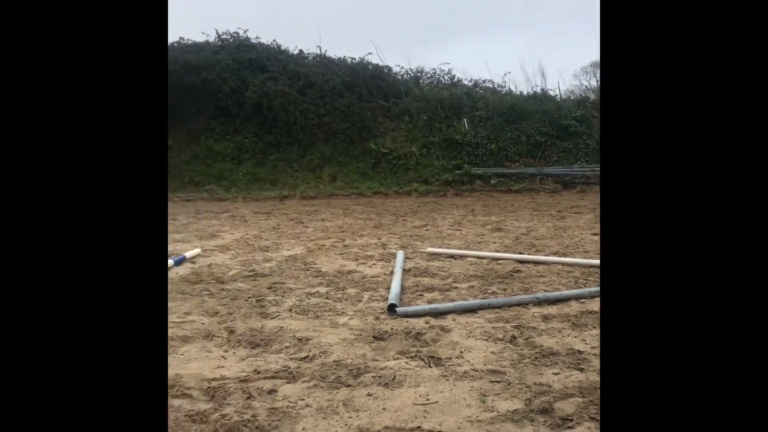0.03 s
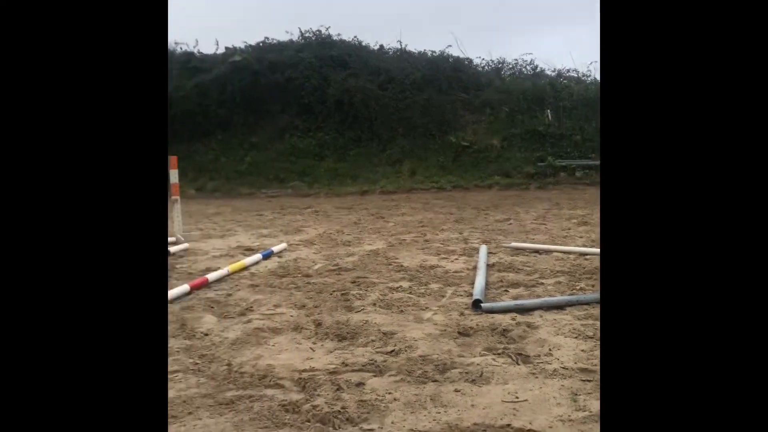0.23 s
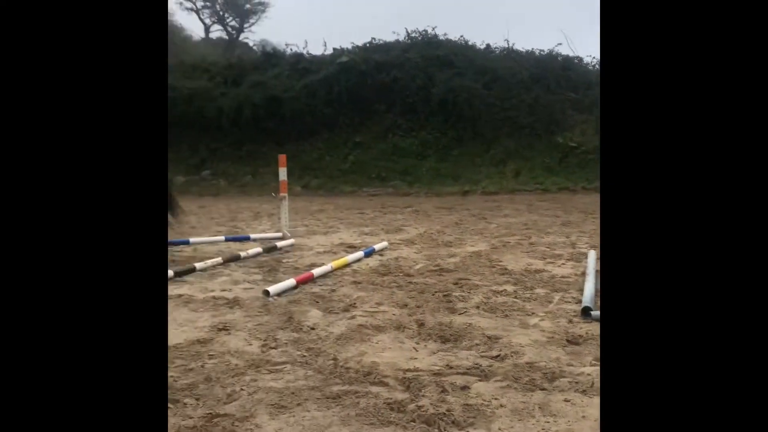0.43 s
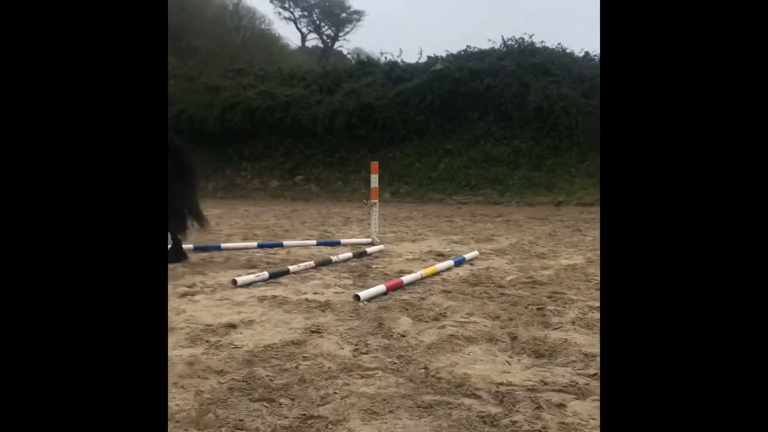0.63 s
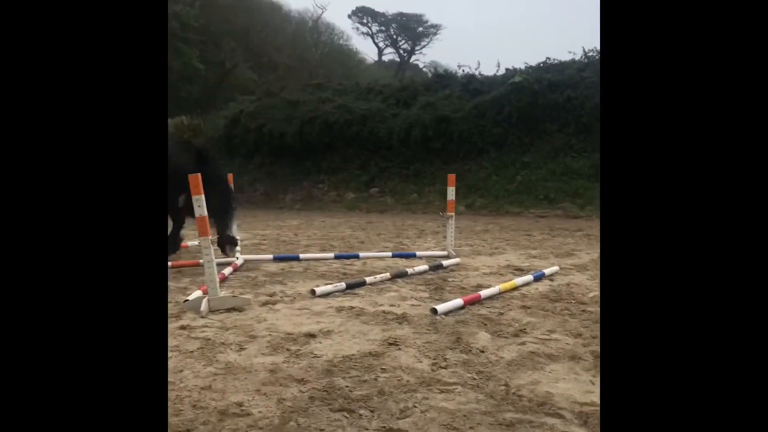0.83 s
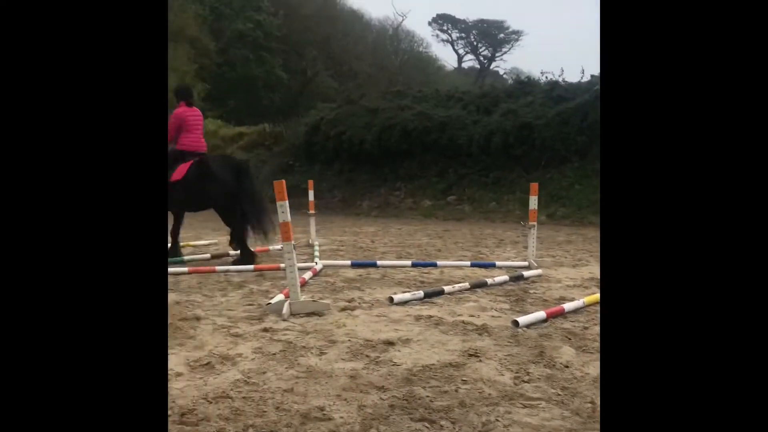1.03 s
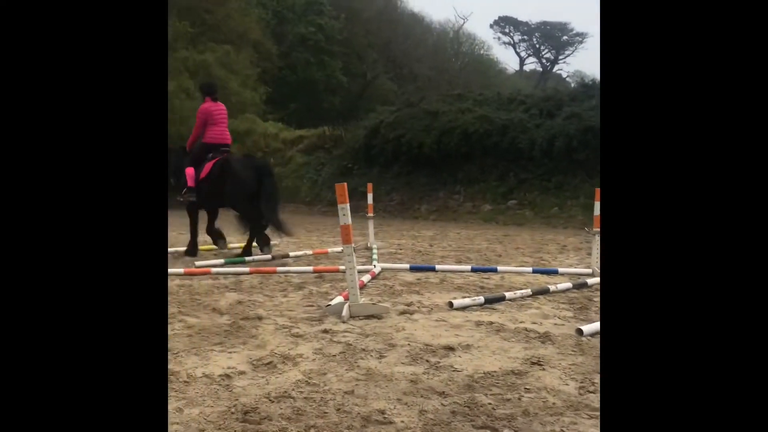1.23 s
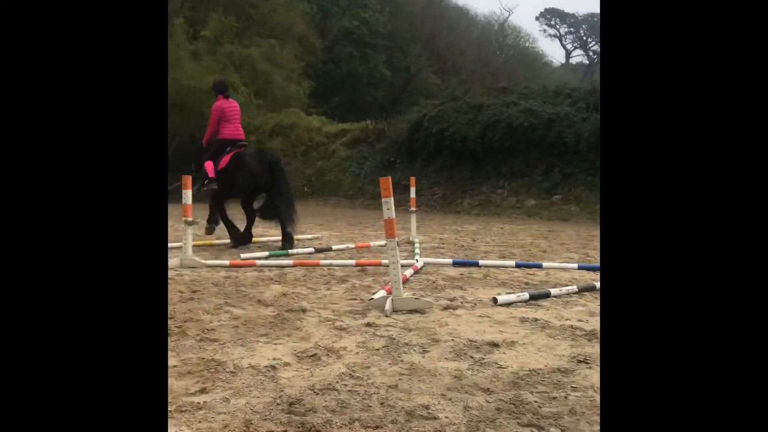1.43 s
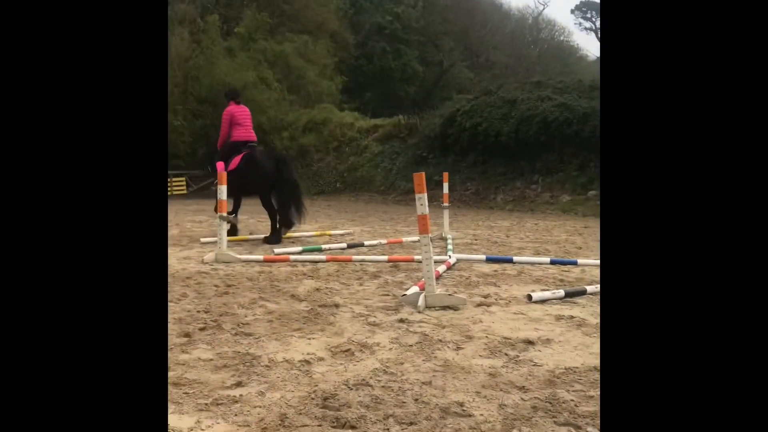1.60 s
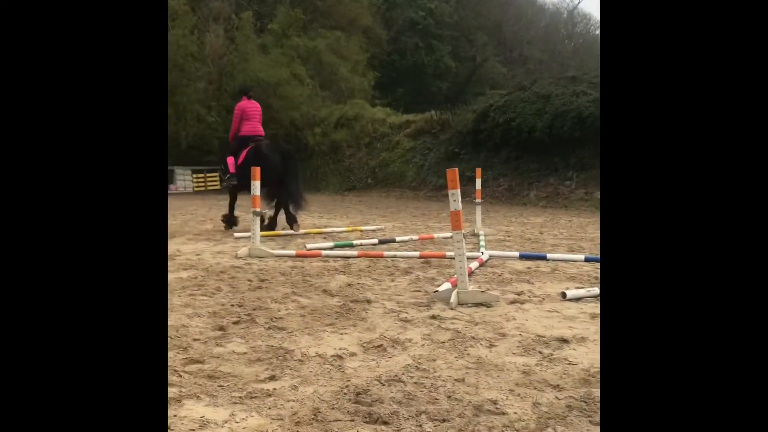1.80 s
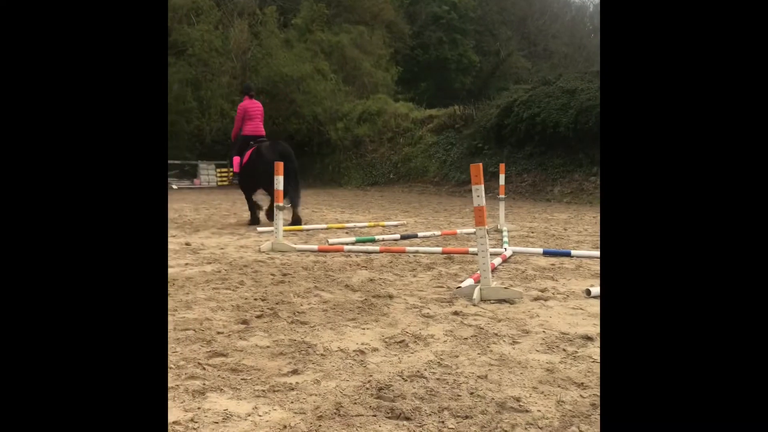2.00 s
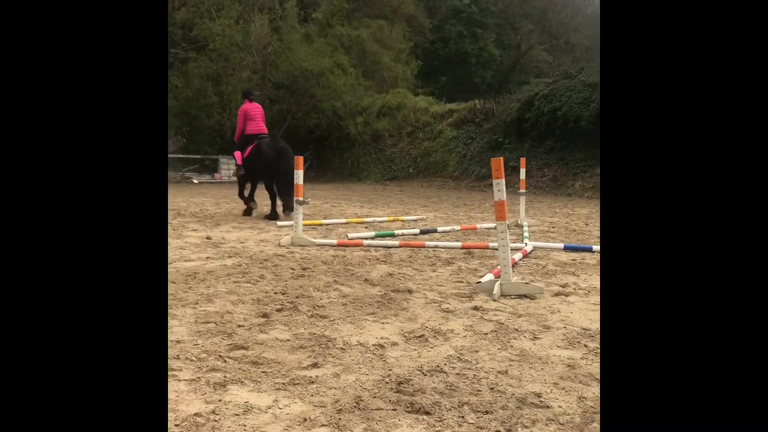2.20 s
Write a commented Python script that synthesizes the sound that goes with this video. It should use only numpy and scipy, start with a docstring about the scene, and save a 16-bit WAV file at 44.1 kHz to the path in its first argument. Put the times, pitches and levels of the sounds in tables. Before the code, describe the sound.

A hoof knocks sharply on a wooden jump pole, with wind buffeting the microphone.

```python
"""Wind rumbles on the microphone over a soft wash of distant leaves, and sand scuffs in an outdoor arena.
A hoof raps a jump pole: the hard contacts give a sharp double crack, the pole's damped modes a hollow
ring, and kicked grains a hiss, while hedges and fences scatter a thin echo. Lighter taps and small
clicks follow among thumping eddies of wind, with two faint gliding tones and a late metallic clink."""
import sys
import numpy as np
from scipy import signal
from scipy.fft import rfft, irfft
from scipy.io import wavfile
from scipy.ndimage import uniform_filter1d

SR = 44100
rng = np.random.default_rng(int(sys.argv[2]) if len(sys.argv) > 2 else 0)


def wav_out(sig):
    """Save sig, one row per channel (or a flat mono array), as 16-bit PCM at SR to the path in sys.argv[1]."""
    wavfile.write(sys.argv[1], SR, np.round(np.clip(np.atleast_2d(sig).T, -1, 1) * 32767).astype(np.int16))


N = 103635


def amp(db):
    """Decibels as an amplitude ratio."""
    return 10 ** (np.asarray(db) / 20)

def unit(x):
    """Normalisation to rms 1."""
    return x / np.sqrt(np.mean(x ** 2) + 1e-20)

def read(points, hz):
    """Interpolation on a log-frequency axis."""
    f, value = np.transpose(points)
    return np.interp(np.log(hz + 1), np.log(f + 1), value)

def add(mix, start_s, sound):
    """Superposition: a sound joins the mix at its start time."""
    part = mix[max(round(start_s * SR), 0):][:len(sound)]
    part += sound[:len(part)]

def colour(x, spectrum):
    """Minimum-phase filtering: a causal response with the given spectrum."""
    log_gain = np.log(amp(read(spectrum, abs(np.fft.fftfreq(2 * N, 1 / SR)))))
    response = np.exp(np.conj(signal.hilbert(log_gain)))
    return irfft(rfft(x, 2 * N) * response[:N + 1])[:N]

def noise(spectrum):
    """Spectral shaping of white noise."""
    gain = amp(read(spectrum, np.fft.rfftfreq(N, 1 / SR)))
    return unit(irfft(rfft(rng.standard_normal(N)) * gain, N))

def steadied(x, span_s):
    """Division by the envelope evens out the chance swells of a noise."""
    power = uniform_filter1d(abs(signal.hilbert(x)) ** 2, max(int(span_s * SR), 2))
    return unit(x / np.sqrt(abs(power) + 1e-9))


# course of the gusts (time [s], rumble level [dB], flutter level [dB])
GUSTS = [(0, -40.5, -65), (0.11, -45, -54), (0.17, -52, -74), (0.24, -36.5, -40), (0.31, -29.5, -34.5),
         (0.369, -45.5, -50), (0.441, -16.5, -25), (0.50, -35, -36.5), (0.58, -32.5, -45.5),
         (0.692, -39.5, -47), (0.752, -21, -25.5), (0.801, -34, -42.5), (0.88, -35, -45),
         (0.938, -26.5, -36), (1.01, -28.5, -50.5), (1.10, -28.5, -34.5), (1.232, -33.5, -33),
         (1.27, -38, -51), (1.32, -31, -48.5), (1.42, -43, -50.5), (1.58, -40.5, -46), (1.761, -28, -43),
         (1.81, -39, -58), (1.88, -31.5, -35), (2.02, -33.5, -47), (2.10, -33, -51), (2.20, -39.5, -57.5),
         (2.29, -32.5, -48), (2.35, -46, -58)]
# spectra of the turbulence (frequency [Hz], relative density [dB])
RUMBLE_SPECTRUM = [(15, -37), (30, 2), (45, 4), (68, 8.5), (90, -0.5), (130, -10.5), (250, -49),
                   (600, -77.5)]
FLUTTER_SPECTRUM = [(40, -22), (90, 2), (135, 1), (200, -7.5), (300, -19), (450, -33), (900, -67),
                    (2000, -93)]
# single eddies (time [s], peak level [dB], centre frequency [Hz])
EDDIES = [(0.4438, -16, 80), (0.4562, -14.5, 110), (0.747, -23, 232), (0.767, -9.5, 65),
          (0.772, -13.5, 208), (0.935, -16, 64), (0.943, -27.5, 151), (0.98, -18, 83.4), (1.0389, -33, 277),
          (1.041, -14.5, 130), (1.8433, -22.5, 120), (1.852, -20, 125), (1.962, -17, 98), (1.974, -18, 93),
          (2.0122, -28.5, 108), (2.051, -21, 93), (2.13, -34, 130), (2.292, -34, 140)]

def wind():
    """Turbulent pressure at the microphone: deep rumble, quicker flutter and eddies that thump."""
    t = np.arange(N) / SR
    times, rumble_db, flutter_db = np.transpose(GUSTS)
    out = steadied(noise(RUMBLE_SPECTRUM), span_s=0.055) * amp(np.interp(t, times, rumble_db))
    out += steadied(noise(FLUTTER_SPECTRUM), span_s=0.041) * amp(np.interp(t, times, flutter_db))
    for centre_s, db, hz in EDDIES:
        u = 2 * np.pi * hz * (t - centre_s)
        out -= amp(db) * u * np.exp((1 - u ** 2) / 2)  # one push, then one pull
    return out


# breeze in distant trees (frequency [Hz], relative density [dB])
LEAF_SPECTRUM = [(30, -14), (200, 0.5), (500, -3.5), (800, -5), (1300, -9), (2000, -15.5), (4000, -19.5),
                 (7000, -23.5), (10000, -27), (16000, -24.5)]

def leaves(level_db=-58.5):
    """Incoherent summation: many distant leaves merge into a slightly wavering wash."""
    wash = noise(LEAF_SPECTRUM)
    waver_db = 0.3 * unit(uniform_filter1d(rng.standard_normal(N), size=3000))
    return amp(level_db + waver_db) * wash


# scuffs of sand (start [s], level [dB], hold [s], decay time [s])
SAND_SCUFFS = [(0.039, -59.5, 0.12, 0.011), (0.238, -33, 0.0064, 0.0096), (0.25, -50.5, 0.08, 0.02),
               (0.379, -54, 0.007, 0.028), (0.496, -59, 0.017, 0.023), (0.532, -61.5, 0.022, 0.18)]
# hiss of the grains (frequency [Hz], relative density [dB])
SAND_SPECTRUM = [(300, -9), (1300, 2.5), (2100, -15), (3800, -3.5), (7000, -5.5), (13000, -4),
                 (16000, -5.5)]

def sand(grains_per_s=2500, spread_db=4.0, rise_s=0.005):
    """Shot noise: tiny random impacts of kicked sand form a hiss that swells, holds and dies away."""
    t = np.arange(N) / SR
    sizes = amp(spread_db * np.minimum(rng.exponential(1, N), 4)) * rng.choice([-1., 1.], N)
    impacts = sizes * (rng.random(N) < grains_per_s / SR)
    envelope = np.zeros(N)
    for start_s, db, hold_s, decay_s in SAND_SCUFFS:
        rise = np.clip((t - start_s) / rise_s, 0, 1)
        envelope += amp(db) * rise * np.exp(-np.maximum(t - start_s - hold_s, 0) / decay_s)
    return unit(colour(impacts, SAND_SPECTRUM)) * envelope


def struck_wood(blows, modes, spread_db=1.07, spread_rad=0.55, clatter_s=0.0086, attack_s=0.00025):
    """Impact excitation: damped modes ring over a brief clatter; soft contacts favour the low ones."""
    out, t = np.zeros(N), np.arange(SR // 3) / SR
    hz, db, t60 = np.transpose(modes)[:, :, None]
    signs = (-1) ** np.arange(len(hz))[:, None]
    for start_s, level_db, bright_hz, tuning, t60_ratio, clatter_db in blows:
        level_draw, phase_draw = rng.standard_normal((2, len(hz), 1))
        contact_lowpass = 1 / np.sqrt(1 + (hz / bright_hz) ** 4)
        envelopes = contact_lowpass * amp(db + spread_db * level_draw - 60 * t / (t60 * t60_ratio))
        ring = (signs * envelopes * np.sin(2 * np.pi * hz * tuning * t + spread_rad * phase_draw)).sum(0)
        band = signal.butter(2, [200, np.clip(bright_hz, 400, 9000)], "band", fs=SR, output="sos")
        clatter = signal.sosfilt(band, rng.standard_normal(len(t))) * np.exp(-t / clatter_s)
        attack = 1 - np.exp(-t / attack_s)
        add(out, start_s, amp(level_db) * attack * (0.5 * ring + amp(clatter_db) * clatter))
    return out


# blows on the pole (time [s], level [dB], brightness [Hz], tuning [ratio], T60 [ratio], clatter [dB])
POLE_BLOWS = [(0.2305, -26.5, 1220, 0.99, 0.54, 1.5), (0.2336, -23, 2600, 0.98, 0.51, -2.5),
              (0.2441, -29.5, 4040, 0.91, 0.69, 4), (0.2605, -28, 910, 0.67, 0.33, 10),
              (0.2665, -40.5, 700, 0.94, .6, 5.5)]
# modes of the pole (frequency [Hz], relative level [dB], T60 [s])
POLE_MODES = [(271, -4, 0.17), (485.4, 3, 0.083), (606, 3.5, 0.12), (695, 1.5, 0.086), (770, -6.5, 0.22),
              (816, -8.5, 0.18), (972, -0.5, 0.07), (1247, -9.5, 0.12), (1262, 5, 0.044), (1392, -8, 0.045),
              (1491, 2, 0.092), (1720, -6.5, 0.091), (1943, -6.5, 0.058), (3050, -15, 0.035),
              (3920, -23, 0.035)]

def pole_knocks():
    """Free vibration: the pole rings in its modes as the hoof raps and jostles it."""
    return struck_wood(POLE_BLOWS, POLE_MODES)


# cracks and clicks (time [s], relative level [dB], decay time [s], lower edge [Hz])
HARD_CONTACTS = [(0.2328, -9.5, 0.00031, 2500), (0.2444, -10.5, 0.00046, 2000), (0.2536, -34, 0.0024, 2500),
                 (0.2753, -36, 0.00033, 7000), (0.4445, -47.5, .0005, 6000), (0.4668, -44, .0005, 8000),
                 (0.503, -44.5, 0.0049, 8040), (0.598, -49, .0005, 8000), (0.6572, -29, 0.00048, 10200),
                 (0.8221, -28.5, 0.0018, 8040), (0.826, -26.5, 0.0014, 8000), (0.879, -34.5, 0.0005, 6000),
                 (0.893, -46, 0.00073, 3000), (1.023, -53, 0.00076, 6960), (1.3755, -55, .0005, 8000),
                 (1.99, -45.5, 0.00086, 3200)]
# colour of a click (frequency [Hz], gain [dB])
CLICK_SPECTRUM = [(500, 4), (2200, -28), (3000, -1), (4000, -11.5), (4900, -13.5), (6000, -6.5), (6800, -9),
                  (9300, -3), (10900, -4), (12700, -4), (14000, -6.5), (16000, -6)]

def clicks(snap_db=8, tail_db=-10.5, tail_s=0.0018):
    """A brief impulse has a broad spectrum: hard contacts give a snap, a bright burst and a faint tail."""
    out, t = np.zeros(N), np.arange(SR // 20) / SR
    for start_s, level_db, decay_s, edge_hz in HARD_CONTACTS:
        envelope = np.exp(-t / decay_s) + amp(tail_db) * np.exp(-t / tail_s)
        burst = envelope * rng.choice([-1., 1.], len(t))
        burst[0] = amp(snap_db)
        highpass = signal.butter(2, edge_hz, "high", fs=SR, output="sos")
        add(out, start_s, amp(level_db + 4) * signal.sosfilt(highpass, burst))
    return colour(out, CLICK_SPECTRUM)


# decay of the echo (frequency [Hz], T60 [s])
ECHO_DECAY = [(200, .5), (400, 1), (650, 0.88), (1300, 0.41), (5000, 0.76), (16000, 0.1)]
# colour of the echo (frequency [Hz], gain [dB])
ECHO_SPECTRUM = [(200, 5.5), (400, -3), (620, -9), (1200, -0.5), (2000, -3), (16000, 4)]

def echo(x, reflections_per_s=2500, build_s=0.014):
    """Scattering: hedges and fences return many weak reflections, each band fading at its own rate."""
    reflections = rng.standard_normal(SR) * (rng.random(SR) < reflections_per_s / SR)
    hz, t, bands = signal.stft(reflections, SR, nperseg=256)
    decay = amp(-60 * t / read(ECHO_DECAY, hz)[:, None])
    tail = signal.istft(bands * decay, SR, nperseg=256)[1]
    tail *= np.minimum(np.arange(len(tail)) / SR / build_s, 1)
    return colour(signal.fftconvolve(x, tail / np.linalg.norm(tail))[:N], ECHO_SPECTRUM)


# light blows (time [s], level [dB], brightness [Hz], tuning [ratio], T60 [ratio], clatter [dB])
TAP_BLOWS = [(0.543, -47, 1360, 1.05, 1.05, 14), (0.550, -43, 500, 0.81, 1.4, -17),
             (0.5715, -58, 2000, 1.2, 0.63, 14.5), (0.8205, -41.5, 910, 1.02, 0.54, -9),
             (0.877, -42.5, 3970, 0.94, 0.42, 1), (0.893, -46.5, 3000, 0.77, 0.5, 0),
             (0.9195, -49, 1770, 0.94, 0.78, 5), (1.663, -53, 2580, 1.16, 0.3, 6)]
# modes of a tap (frequency [Hz], relative level [dB], T60 [s])
TAP_MODES = [(619, 12.5, 0.099), (717, 3.5, 0.065), (1330, -11, 0.086), (1700, 1.5, 0.054),
             (2000, 3, 0.087), (2760, -13, 0.045), (3500, -10, 0.037)]

def hoof_taps():
    """Damped resonance: lighter hoof contacts excite a few short, hollow-sounding modes."""
    return struck_wood(TAP_BLOWS, TAP_MODES)


# gliding tones (start [s], duration [s], level [dB], first frequency [Hz], last frequency [Hz])
GLIDING_TONES = [(0.594, 0.103, -54.5, 498, 689), (0.913, 0.094, -63, 613, 520)]

def glides():
    """Frequency modulation: faint far-off tones slide in pitch as they swell and fade."""
    out = np.zeros(N)
    for start_s, length_s, db, first_hz, last_hz in GLIDING_TONES:
        progress = np.linspace(0, 1, int(length_s * SR))
        cycles = np.cumsum(first_hz + (last_hz - first_hz) * progress ** 1.52) / SR
        swell = np.sqrt(abs(np.sin(np.pi * progress)))
        add(out, start_s, amp(db) * swell * np.sin(2 * np.pi * cycles))
    return out


# modes of a small piece of metal (frequency [Hz], level [dB], T60 [s])
METAL_MODES = [(3750, -45, 0.021), (5400, -55, 0.022)]

def clink(start_s=1.9898):
    """Inharmonic modes: a small piece of metal, perhaps on the tack, rings briefly."""
    out, t = np.zeros(N), np.arange(SR // 8) / SR
    for hz, db, t60 in METAL_MODES:
        add(out, start_s, amp(db - 60 * t / t60) * np.sin(2 * np.pi * hz * t))
    return out


def scene():
    """Linear superposition: the sources sum in one channel; only the knocks and clicks feed the echo."""
    knocks, cracks = pole_knocks(), clicks()
    scatter = echo(amp(-9.5) * knocks + amp(-26) * cracks)
    return (wind() + leaves() + sand() + knocks + cracks + scatter + hoof_taps() + glides() + clink())[None]

def record(dry):
    """Band limiting: the microphone rolls off the bass, and a steep low-pass removes the top treble."""
    bass_rolloff = signal.butter(4, 37, "high", fs=SR, output="sos")
    lowpass = signal.firwin(255, cutoff=16100, window=("kaiser", 9), fs=SR)
    return signal.oaconvolve(signal.sosfilt(bass_rolloff, dry), lowpass[None], "same")


dry = scene()
out = record(dry)
wav_out(out)
```